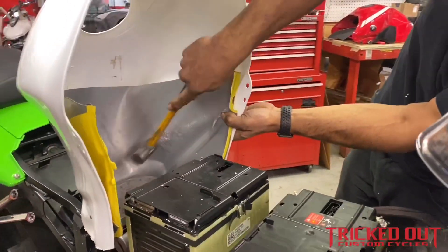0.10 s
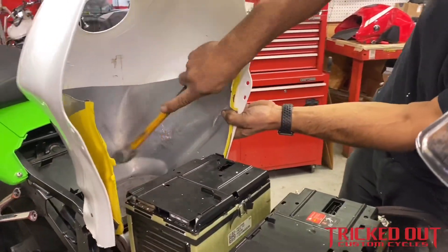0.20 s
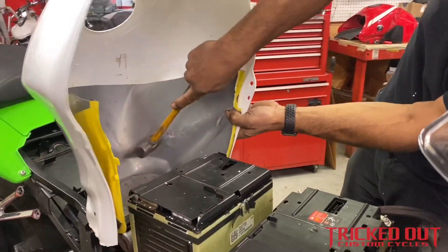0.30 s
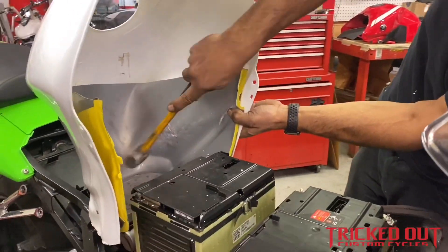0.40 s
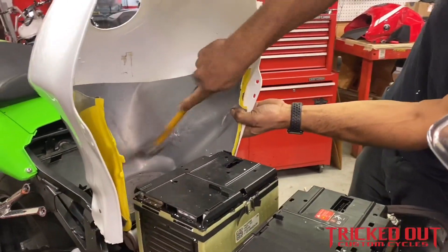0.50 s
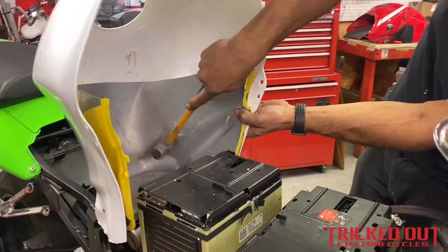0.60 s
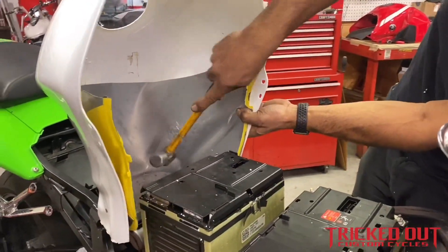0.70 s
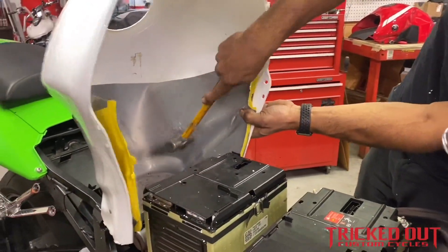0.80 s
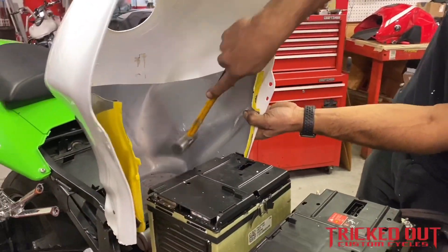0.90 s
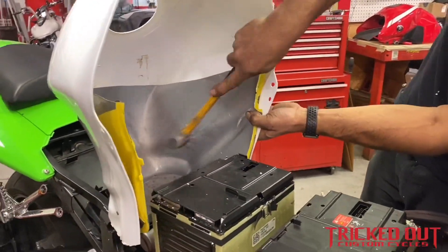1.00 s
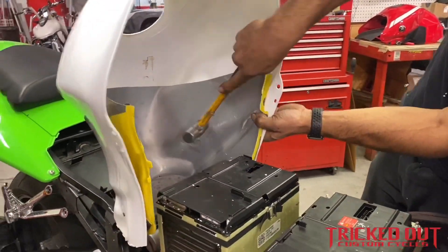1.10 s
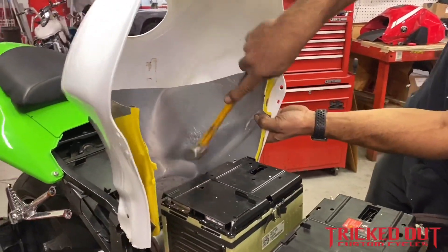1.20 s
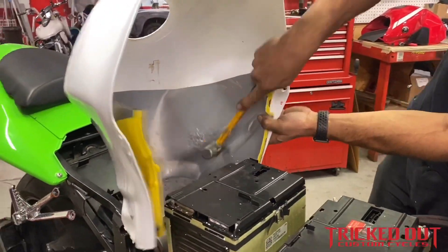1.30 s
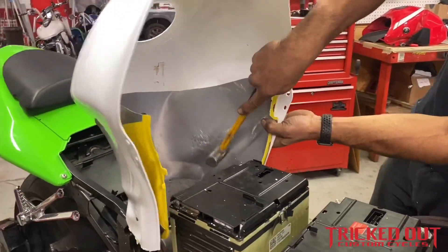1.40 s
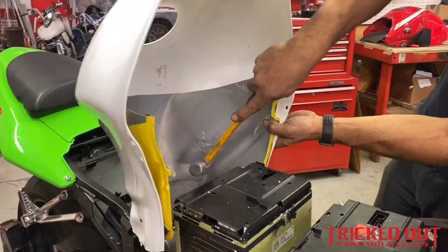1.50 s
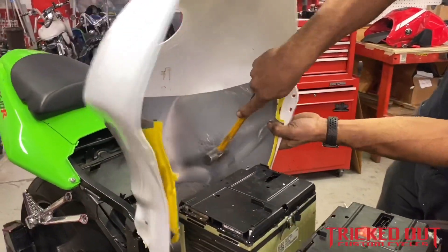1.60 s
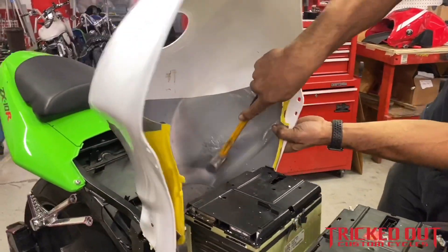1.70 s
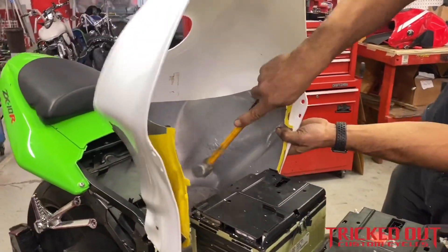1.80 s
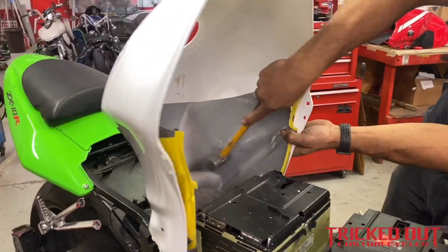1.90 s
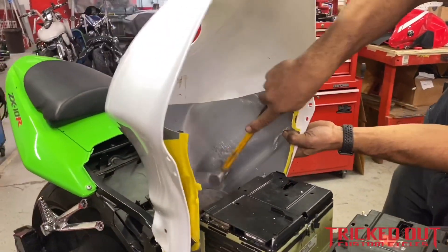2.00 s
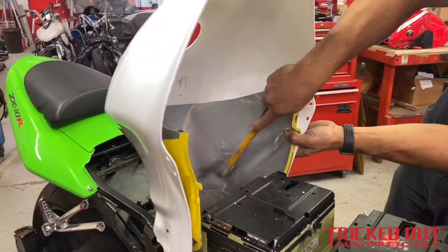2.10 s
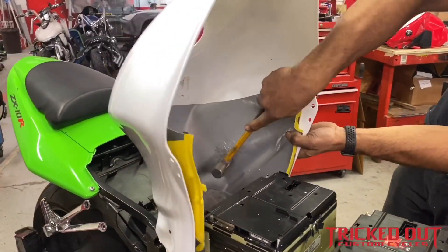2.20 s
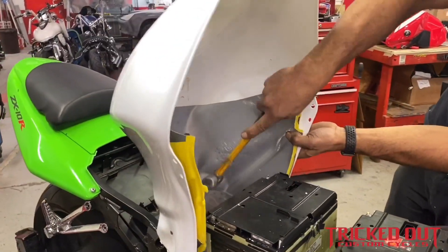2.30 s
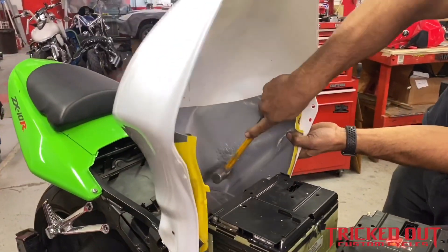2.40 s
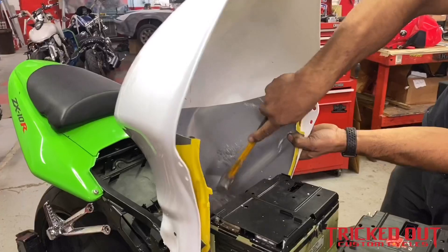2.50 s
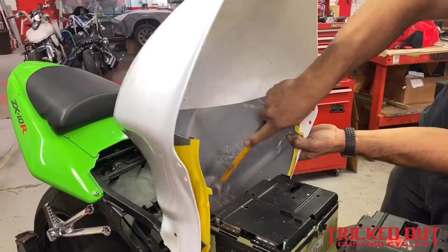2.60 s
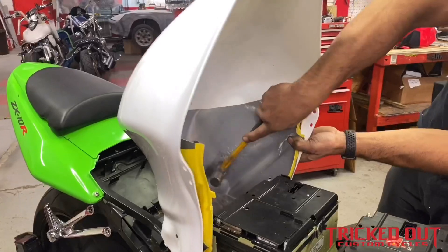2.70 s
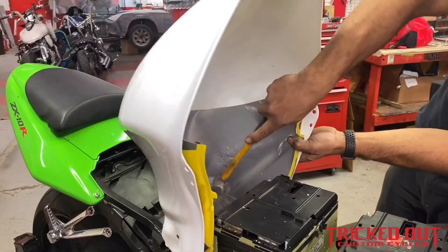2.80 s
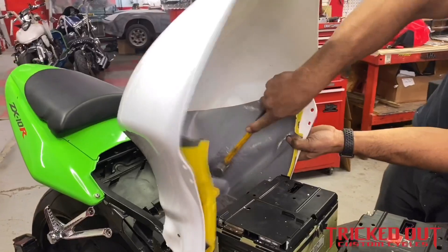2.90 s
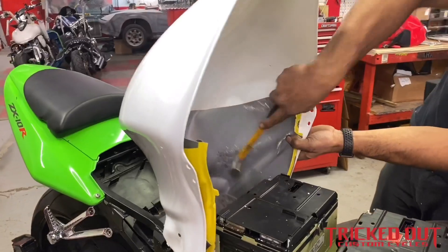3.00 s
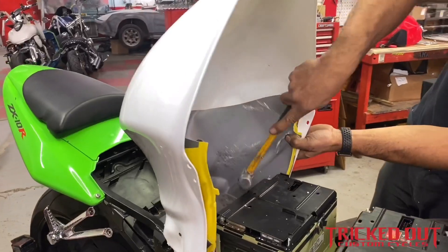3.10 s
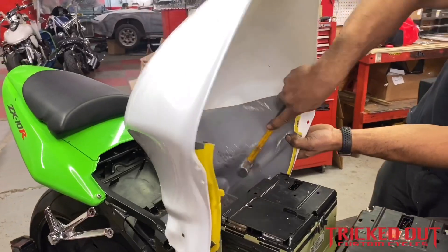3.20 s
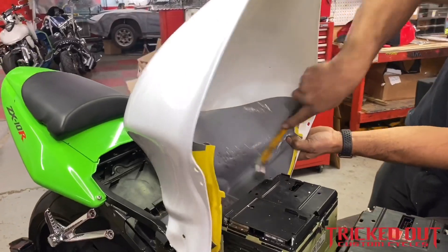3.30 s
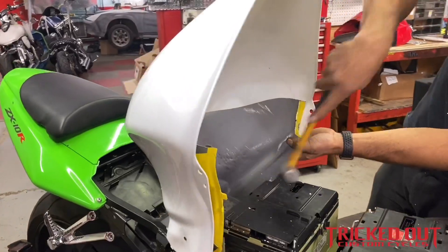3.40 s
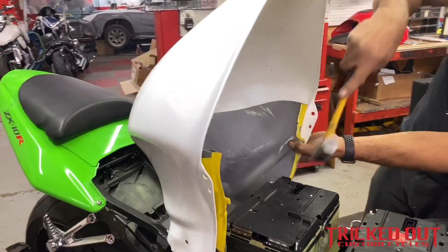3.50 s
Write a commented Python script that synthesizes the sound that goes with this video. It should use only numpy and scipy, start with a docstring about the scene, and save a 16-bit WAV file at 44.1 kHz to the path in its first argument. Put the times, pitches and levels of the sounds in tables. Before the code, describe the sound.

A hammer taps sheet metal about four times a second, dull clanky knocks close up

```python
"""A small hammer beats a thin tank shell about four times a second in a workshop, close to a stereo microphone.
Each blow is a crack of bright noise, many short shell modes, a few clear and long ones made of fading sines,
a brief ring of the struck patch, and a low thump of the stand. Fading noise tails make the workshop's echo,
over a faint steady rumble of shaped noise. The tail of an earlier blow opens the scene."""
import sys
import numpy as np
from scipy import signal
from scipy.fft import rfft, irfft
from scipy.io import wavfile

SR = 44100
rng = np.random.default_rng(int(sys.argv[2]) if len(sys.argv) > 2 else 0)


def dump(signal):
    """Clip the signal to [-1, 1] and save it as 16-bit WAV at the path in sys.argv[1]."""
    limited = np.clip(np.atleast_2d(signal).T, -1, 1)
    pcm = np.round(limited * 32767).astype(np.int16)
    wavfile.write(sys.argv[1], SR, pcm)


def rack_gain(trim_db):
    """Turn a fader trim in dB into the linear factor to multiply a signal by."""
    fader = np.asarray(trim_db, float)
    return 10 ** (fader / 20)


N = 154350  # samples in the scene

SIDES = 5  # the shell sounds differently in each direction


def read(points, hz):
    """Reads a curve of (Hz, value) points at any frequency, along a log frequency scale."""
    f, value = np.transpose(points)
    return np.interp(np.log(hz + 1), np.log(f + 1), value)


# The hammer blows; the struck spot favours modes near its pitch.
# Columns: start_s (before the shift below), strength_db, thump_db (relative to strength), brightness_db,
# spot_pitch_hz
BLOWS = [(-0.12, -3.5, -22.5, -6, 780), (0.202, -3.5, -27, -13.5, 867), (0.476, -4.5, -24.5, -13, 1030),
         (0.731, -6.5, -24.5, -10.5, 572), (0.998, -5, -22, -12.5, 1120), (1.264, -5.5, -20.5, -9, 580),
         (1.536, -7, -23, -9.5, 611), (1.806, -4.5, -25, -12.5, 922), (2.075, -7, -24.5, -11, 1314),
         (2.326, -5, -25.5, -11.5, 846), (2.594, -6, -25, -10, 799), (2.848, -4, -26, -13.5, 800),
         (3.126, -9.5, -25.5, -6, 584)]
START_SHIFT_S = 0.00062  # constant shift added to every blow's start time


def place(sounds):
    """Lays one sound, in all its directions, at each blow; the line starts one second before the scene."""
    out = np.zeros((SIDES, 3 * SR + N))
    for blow, sound in zip(BLOWS, sounds):
        at = round((1 + blow[0] + START_SHIFT_S) * SR)
        out[:, at:at + sound.shape[1]] += sound
    return out[:, :SR + N]


DETUNE = 0.012  # typical share by which the hand and the dent shift the modes


def ring(hz, db, t60, rise, blow_db, length, detune, scatter_db=3.0):
    """Each blow rings one set of fading sines, with its own levels, and its own signs in each direction."""
    chance = rng.standard_normal((len(BLOWS), 2 + SIDES, len(hz)))
    sounds = []
    for db_k, c in zip(blow_db, chance):
        # stretching time shifts pitch, decay and rise together
        t = np.arange(round(length * SR)) / SR * (1 + detune * c[1, 0])
        if detune or not sounds:  # without detuning, all blows share the same modes
            fade = rack_gain(db[:, None] - 60 * t / t60[:, None])
            modes = fade * np.sin(2 * np.pi * hz[:, None] * t) * (1 - np.exp(-t / rise))
        share = rack_gain(db_k + scatter_db * c[0])
        sounds.append((np.sign(c[2:]) * share) @ modes)
    return place(sounds)


BRIGHT_FROM_HZ, BRIGHT_MEAN_DB = 940, -16.5
SPOT_DB, SPOT_OCTAVES = 4.5, 0.4  # lift of modes near the spot's pitch, and its spread


def spot(hz):
    """Gain in dB of each mode under each blow: strength, brightness and the struck spot."""
    _, db, _, bright_db, spot_hz = np.transpose(BLOWS)[:, :, None]
    treble = 1 / (1 + (BRIGHT_FROM_HZ / hz) ** 2)
    near = np.exp(-0.5 * (np.log2(hz / spot_hz) / SPOT_OCTAVES) ** 2)
    return db + treble * (bright_db - BRIGHT_MEAN_DB) + SPOT_DB * near


RISE_S_AT_1K = 0.0011


def bending_rise(hz):
    """Slower bending waves arrive later: the rise time goes with 1 / sqrt(Hz)."""
    return RISE_S_AT_1K * np.sqrt(1000 / hz)[:, None]


CRACK_DB, CRACK_HZ = -12.5, 3500  # level, and the pitch above which the noise passes
CRACK_T60_S, CRACK_RISE_S = 0.028, 0.0007


def crack():
    """The steel face meets the wall: a short burst of bright noise at contact."""
    t = np.arange(1500) / SR
    high_pass = signal.butter(2, CRACK_HZ, "high", fs=SR)
    noise = signal.lfilter(*high_pass, rng.standard_normal((len(BLOWS), SIDES, len(t))))
    blow_db = np.array([row[1] + row[3] - BRIGHT_MEAN_DB for row in BLOWS])
    fade = rack_gain(blow_db[:, None, None] + CRACK_DB - 60 * t / CRACK_T60_S)
    return place(noise * fade * (1 - np.exp(-t / CRACK_RISE_S)))


# Clear modes of the shell.
# Columns: pitch_hz, level_db (before each blow's own gain)
CLEAR_MODES = [(232, -29), (612, -15.5), (700, -23), (803, -21), (870, -24), (1000, -21), (1080, -19),
               (1340, -18), (1445, -14), (1810, -39.5), (2115, -31.5), (2640, -25), (3230, -30.5),
               (4200, -34)]
CLEAR_CYCLES = 62  # cycles until a mode is 60 dB down


def clear_modes():
    """The shell's clear modes ring as fading sines; higher ones die sooner."""
    hz, db = np.transpose(CLEAR_MODES)
    return ring(hz, db, CLEAR_CYCLES / hz, bending_rise(hz), spot(hz), 0.4, DETUNE)


# The crowd of small modes, as a level curve.
# Columns: pitch_hz, relative_level_db_per_hz
DENSE = [(120, -12.5), (250, 4.5), (420, -6.5), (650, -2), (1000, -2), (1600, -7), (2200, -9), (3200, -12),
         (4500, -17), (6500, -22), (10000, -24), (15500, -27.5), (16800, -48)]
# How soon the small modes are 60 dB down.
# Columns: pitch_hz, t60_s
DENSE_T60 = [(150, 0.13), (500, 0.17), (1200, 0.047), (3000, 0.075), (7000, 0.029), (15000, 0.017)]
DENSE_DB = -9  # gain of the whole crowd


def dense_modes():
    """The damped shell's crowd of 900 short modes, packed closer at low pitch."""
    u = (np.arange(900) + rng.random(900)) / 900
    hz = 120 + 16600 * u ** 1.4
    t60 = read(DENSE_T60, hz)
    # wider spacing or quicker decay calls for louder modes
    db = read(DENSE, hz) + 10 * np.log10(u ** 0.4 / t60 / 200) + DENSE_DB
    return ring(hz, db, t60, bending_rise(hz), spot(hz), 0.14, 0)


# Sines of the struck patch.
# Columns: pitch_ratio (times the spot's pitch), relative_level_db
BONK_PARTS = [(1, -0.2), (1.4, -7), (.8, -8)]
BONK_DB, BONK_T60_S = -11, 0.07


def bonk():
    """The patch under the hammer rings briefly at and near the spot's own pitch."""
    t = np.arange(4000) / SR
    part, part_db = np.transpose(BONK_PARTS)
    phases = rng.uniform(-1.17, 1, (len(BLOWS), SIDES, len(part), 1))  # radians
    fade = rack_gain(part_db[:, None] + BONK_DB - 60 * t / BONK_T60_S)
    shape = fade * (1 - np.exp(-t / RISE_S_AT_1K))
    sounds = []
    for blow, phase in zip(BLOWS, phases):
        waves = np.sin(2 * np.pi * blow[4] * part[:, None] * t + phase)
        sounds.append(rack_gain(blow[1]) * (shape * waves).sum(axis=1))
    return place(sounds)


# Low modes of the stand.
# Columns: pitch_hz, relative_level_db, t60_s, follow_ratio (how much it follows each blow's thump_db)
THUMP = [(50.6, -23.5, 0.32, 3), (73, -6.5, 0.094, 3.2), (104.2, -1.5, 0.14, 0.85), (156, 0.5, 0.079, 1.8)]
THUMP_DB, THUMP_MEAN_DB, THUMP_RISE_S = -19.0, -26, 0.007


def thump():
    """Each blow shoves the stand, whose low modes swell and fade."""
    _, blow_db, thump_db = np.transpose(BLOWS)[:3, :, None]
    hz, db, t60, follows = np.transpose(THUMP)
    push_db = blow_db + THUMP_DB + follows * (thump_db - THUMP_MEAN_DB)
    return ring(hz, db, t60, THUMP_RISE_S, push_db, 0.6, DETUNE, 0.77)


# Left-right balance and long-pair level drift over time; hum() plays the level and scene() the balance.
# Columns: time_s, long_pair_level_db, left_over_right_db
DRIFT = [(0.101, -25, 0.8), (.5, -26, 1.5), (.8, -38.5, 0.6), (1.101, -23.5, 0.5), (1.6, -35, 0.1),
         (2.4, -33, -0.6), (3.2, -33, 0.6)]


def hum():
    """Two long modes close in pitch beat against each other."""
    s, blow_db = np.transpose(BLOWS)[:2, :, None]
    at, hum_db, _ = np.transpose(DRIFT)
    hz, t60 = np.array([284, 292]), np.array([0.3, 0.7])  # Hz, s
    return ring(hz, np.zeros(2), t60, 0.025, blow_db + np.interp(s, at, hum_db), 0.9, 0, 0.51)


def hammered_shell():
    """All that the blows set off, in each direction."""
    return crack() + clear_modes() + dense_modes() + bonk() + thump() + hum()


# How soon the early part of the workshop's tail is 60 dB down.
# Columns: pitch_hz, t60_s
WORKSHOP_T60 = [(60, 0.67), (160, 0.51), (420, 0.47), (1100, 0.37), (2900, 0.45), (7700, 0.31),
                (15000, 0.41)]
# Tone of the workshop.
# Columns: pitch_hz, gain_db
WORKSHOP_COLOUR = [(60, -4), (120, -1), (250, -1.5), (600, -1), (1500, -1), (3000, -5), (4000, -5.5),
                   (6000, -2), (9000, -7), (15000, -14)]
WORKSHOP_DB, BUILD_S = 0.5, 0.002
LATE_DB, LATE_STRETCH = -23, 1.7  # the far end of the workshop dies more slowly
DIP_S, DIP_SPREAD_S, DIP_DB = 0.053, 0.0028, -1.5  # the level of the tail dips briefly


def workshop(x):
    """Each direction feeds two unrelated noise tails that build up quickly and die band by band."""
    hz, t, z = signal.stft(rng.standard_normal((SIDES, 2, SR)), SR, nperseg=256)
    fall_db = -60 * np.maximum(t, 0) / read(WORKSHOP_T60, hz)[:, None]
    fall = np.hypot(rack_gain(fall_db), rack_gain(LATE_DB + fall_db / LATE_STRETCH))
    tail = signal.istft(z * fall, SR, nperseg=256)[1][..., :SR]
    t = np.arange(SR) / SR
    dip = rack_gain(DIP_DB * np.exp(-0.5 * ((t - DIP_S) / DIP_SPREAD_S) ** 2))
    tail = tail * (1 - np.exp(-t / BUILD_S)) * dip
    tail = rack_gain(WORKSHOP_DB) * tail / np.linalg.norm(tail[:, 0])
    colour = rack_gain(read(WORKSHOP_COLOUR, np.fft.rfftfreq(SR, 1 / SR)))
    tail = irfft(rfft(tail) * colour, SR)
    return signal.fftconvolve(x[:, None], tail, axes=2).sum(axis=0)[:, :SR + N]


# Tone of the rumble.
# Columns: pitch_hz, relative_level_db
AIR = [(30, -10.5), (100, -9), (300, -8), (1000, -17), (3000, -14), (8000, -19.5), (16000, -51)]
AIR_DB = -68  # overall level


def air():
    """Faint steady rumble of the workshop, made of shaped noise."""
    colour = rack_gain(read(AIR, np.fft.rfftfreq(N, 1 / SR)))
    x = irfft(rfft(rng.standard_normal((2, N))) * colour, N)
    return rack_gain(AIR_DB) * x / x.std()


# Level balance of the two ears.
# Columns: pitch_hz, left_over_right_db
LEFT_OVER_RIGHT = [(100, 0.6), (400, 0.3), (1300, 1.9), (2400, 1.5), (4800, 4), (7500, 2.5), (9500, -0.4)]
# Phase by which the left leads, before the treble lag below.
# Columns: pitch_hz, lead_radians
LEFT_LEADS = [(100, 0.0068), (1000, 0.1), (3200, 0.43), (4200, .3), (6200, 0.042)]
LAG_FROM_HZ, LEFT_LAG_S = 6570, 0.00028  # above this pitch the left side trails


def pair(a, b, same):
    """Left hears a; right hears a blend of a and the unrelated b, shifted in level and phase."""
    hz = np.fft.rfftfreq(len(a), 1 / SR)
    share = np.clip(read(same, hz), 0, 1)
    lag = 2 * np.pi * LEFT_LAG_S * np.maximum(hz - LAG_FROM_HZ, 0)
    lead = read(LEFT_LEADS, hz) - lag
    tilt = rack_gain(read(LEFT_OVER_RIGHT, hz) / 2)
    za, zb = rfft(a), rfft(b)
    right = (share * za + np.sqrt(1 - share ** 2) * zb) * np.exp(-1j * lead)
    return irfft(np.array([za * tilt, right / tilt]), len(a))


# Left-right likeness of the near sound.
# Columns: pitch_hz, likeness (0 to 1, no unit)
SAME_NEAR = [(100, .98), (200, .96), (600, .9), (2000, .72), (3200, .82), (4500, .45), (6000, .6),
             (8000, .88), (15000, .93)]
# Left-right likeness of the workshop's tail.
# Columns: pitch_hz, likeness (0 to 1, no unit)
SAME_FAR = [(100, 0.98), (300, 0.8), (600, 0.29), (1500, 0.34), (5000, 0.14), (7000, 0.19), (9000, 0.64),
            (15000, 0.56)]


def scene():
    """Two directions are heard directly, all of them through the workshop; the balance drifts slowly."""
    near = hammered_shell()
    direct = pair(*near[:2], SAME_NEAR)
    echo = pair(*workshop(near), SAME_FAR)
    both = (direct + echo)[:, SR:]  # drop the second before the scene
    at, _, pan_db = np.transpose(DRIFT)
    balance_db = np.interp(np.arange(N) / SR, at, pan_db)
    return both * rack_gain(balance_db * np.array([[0.5], [-0.5]])) + air()


def top_cut(x):
    """Nothing passes above the cut-off."""
    return signal.sosfilt(signal.butter(12, 16820, fs=SR, output="sos"), x)


CEILING, EDGE_HZ = 1.3, 16100  # level that peaks bend towards; top of the band


def record(dry):
    """Peaks round off softly, then the top of the treble is cut."""
    soft = CEILING * np.tanh(dry / CEILING)
    edge = signal.firwin(101, EDGE_HZ, window=("kaiser", 6), fs=SR)
    mix = np.clip(signal.oaconvolve(soft, edge[None], "same"), -1, 1)
    return top_cut(mix)


dry = scene()
out = record(dry)
dump(out)
```